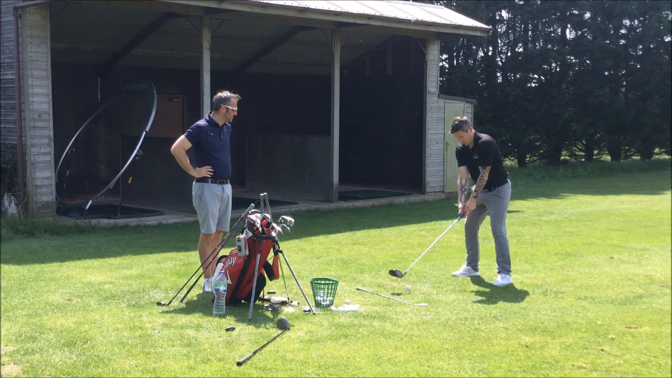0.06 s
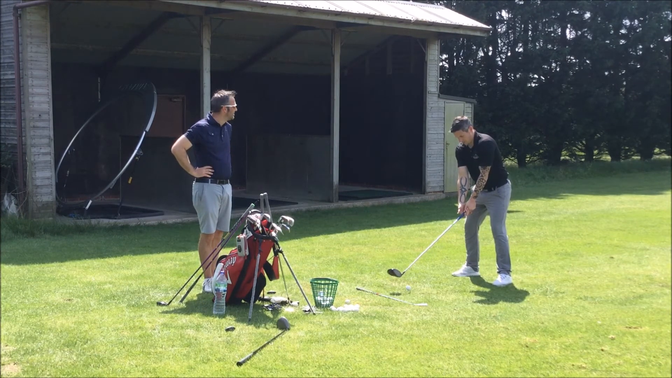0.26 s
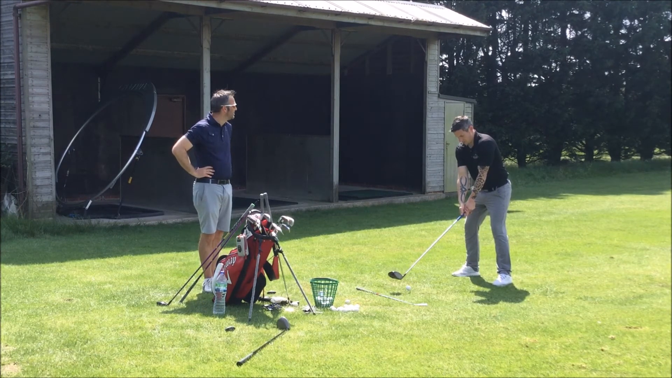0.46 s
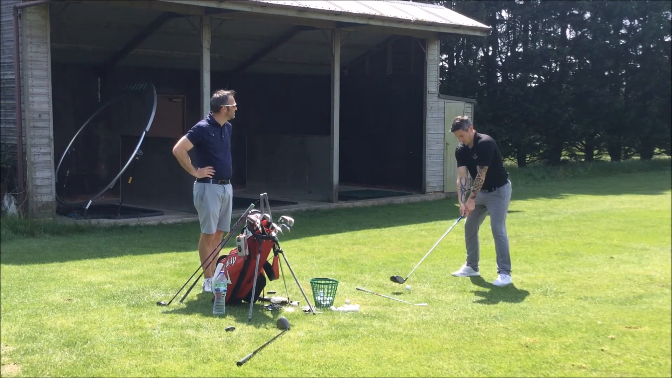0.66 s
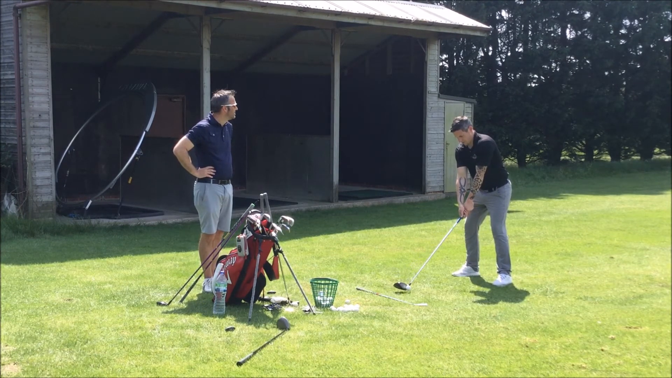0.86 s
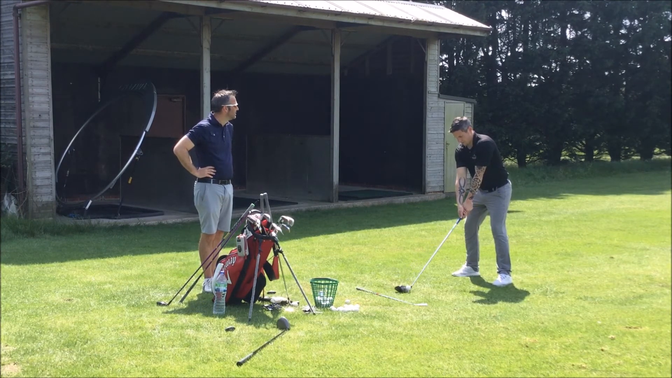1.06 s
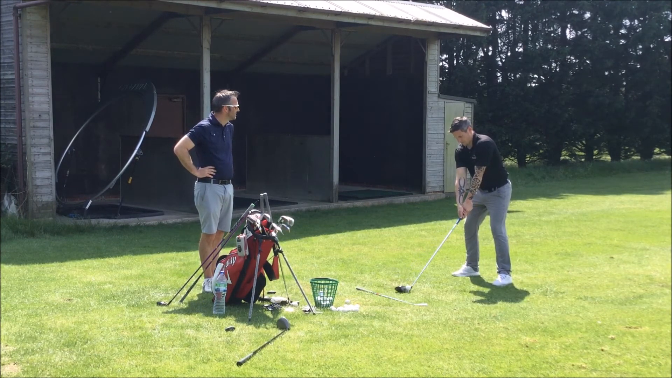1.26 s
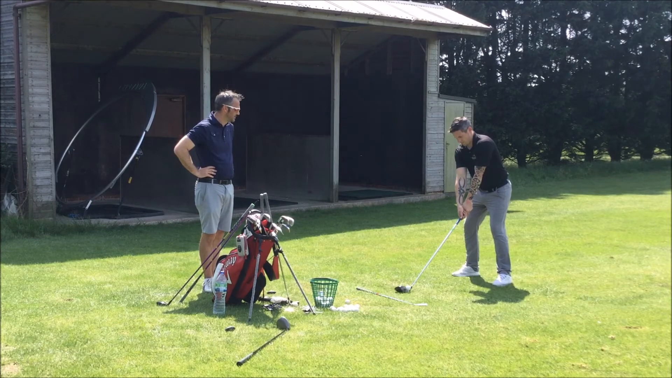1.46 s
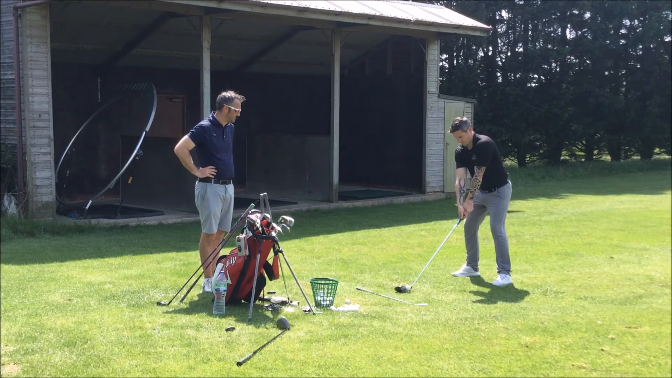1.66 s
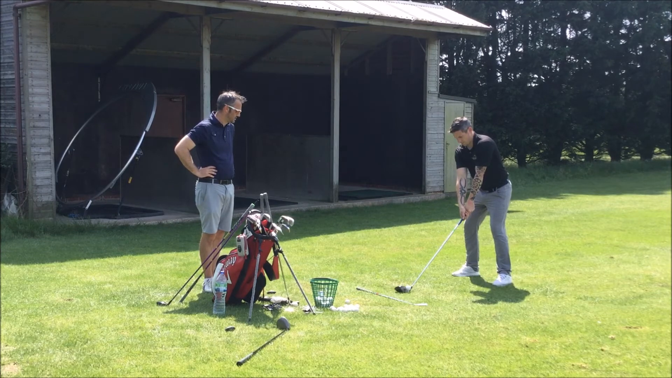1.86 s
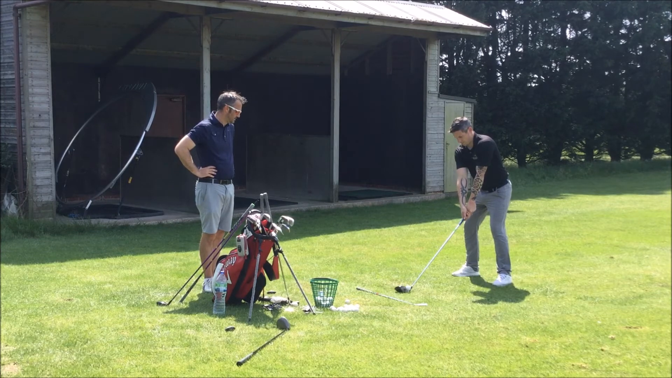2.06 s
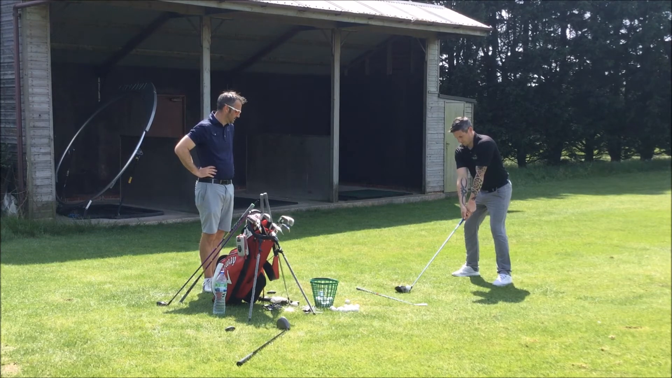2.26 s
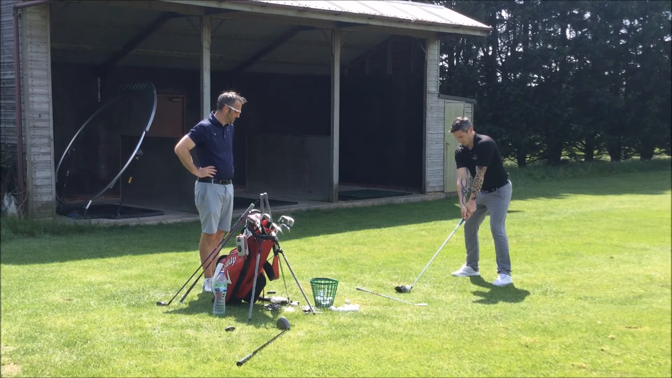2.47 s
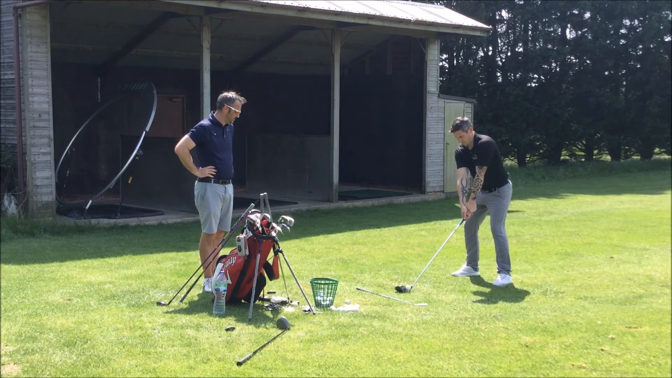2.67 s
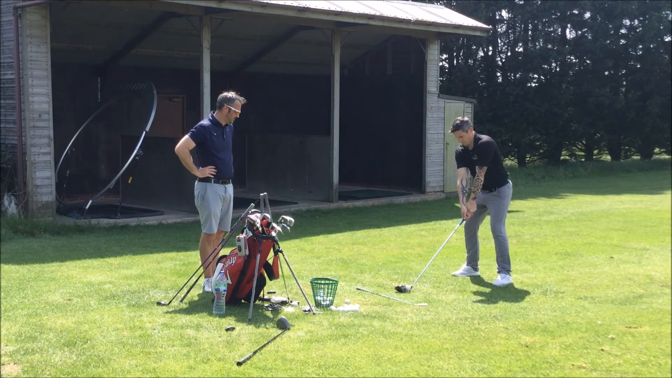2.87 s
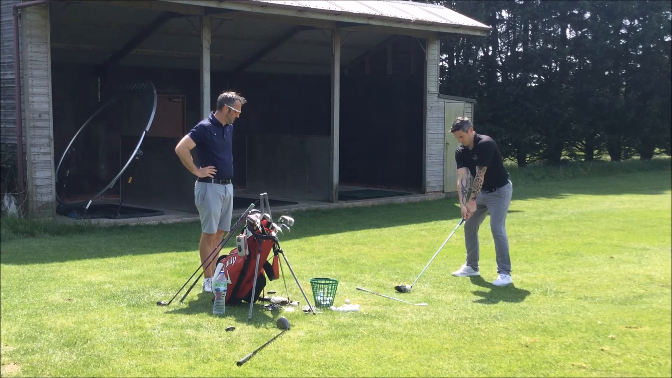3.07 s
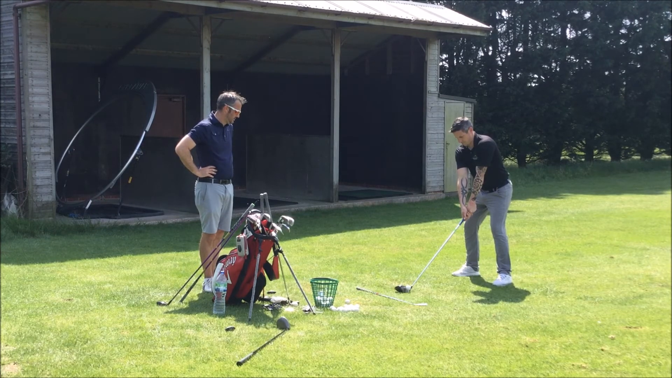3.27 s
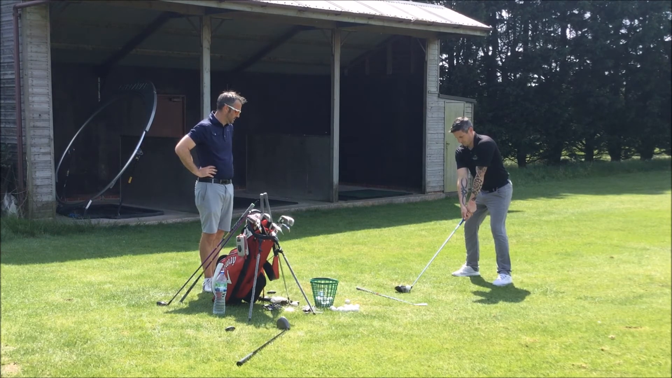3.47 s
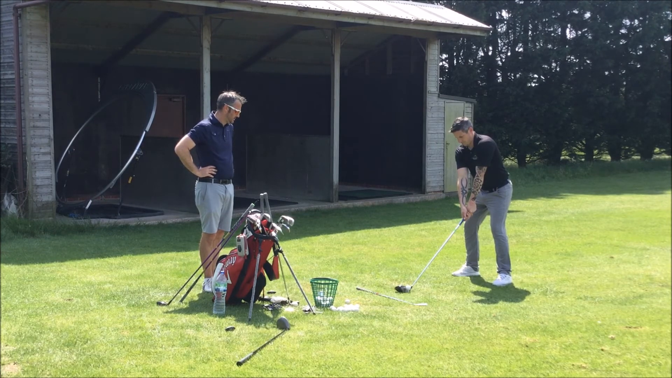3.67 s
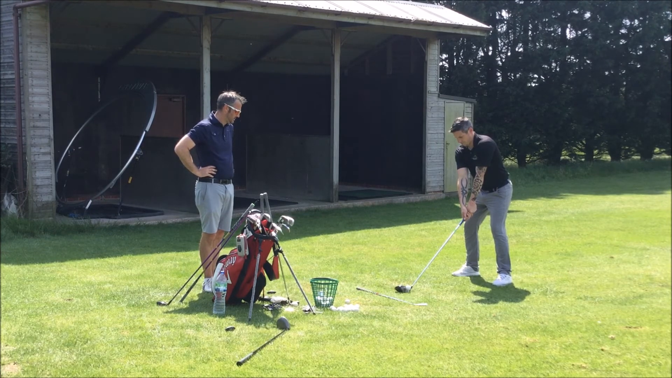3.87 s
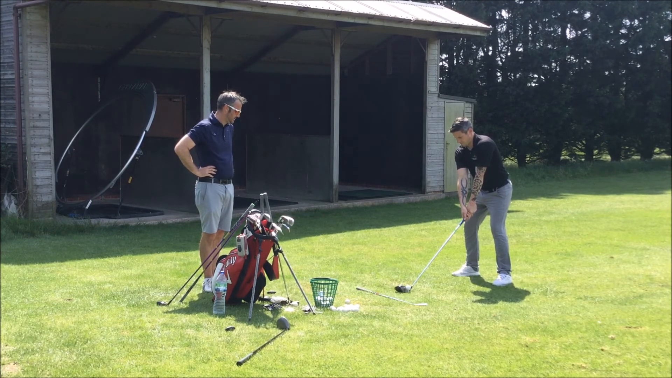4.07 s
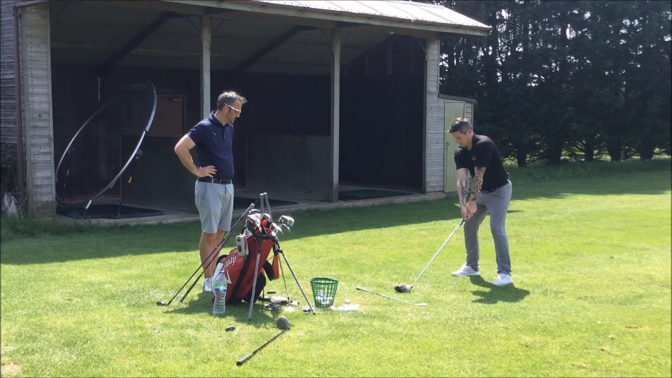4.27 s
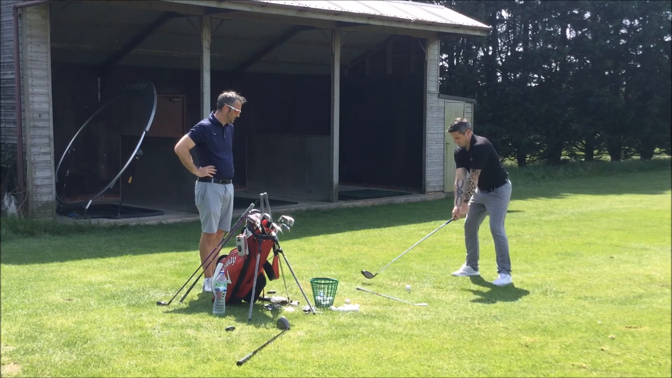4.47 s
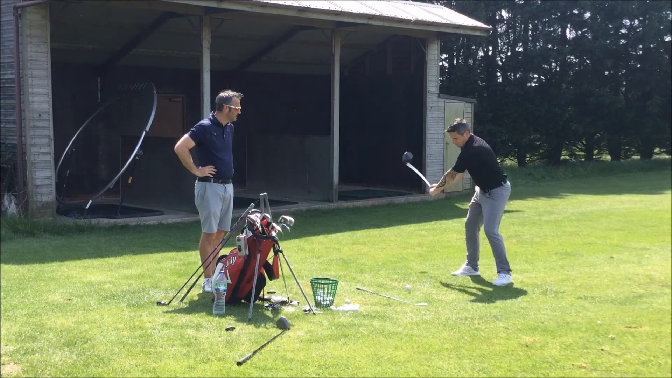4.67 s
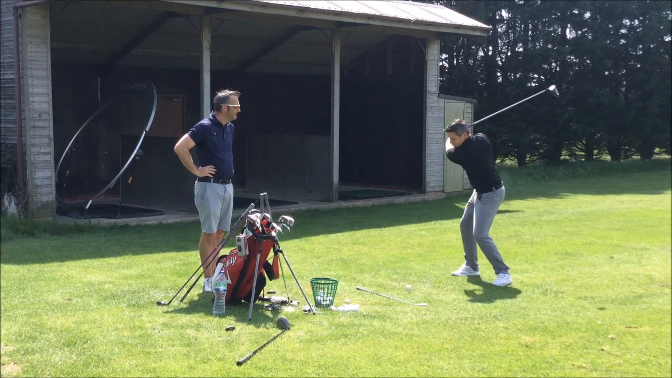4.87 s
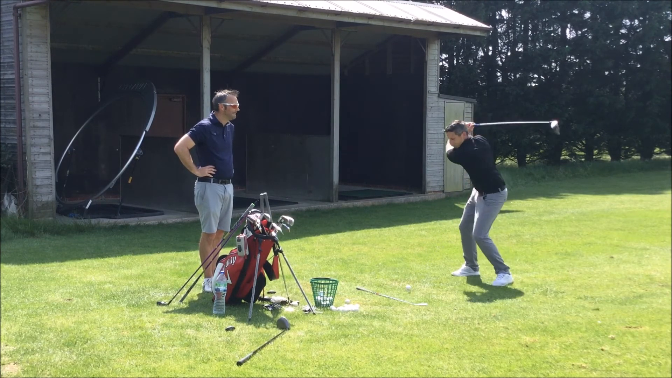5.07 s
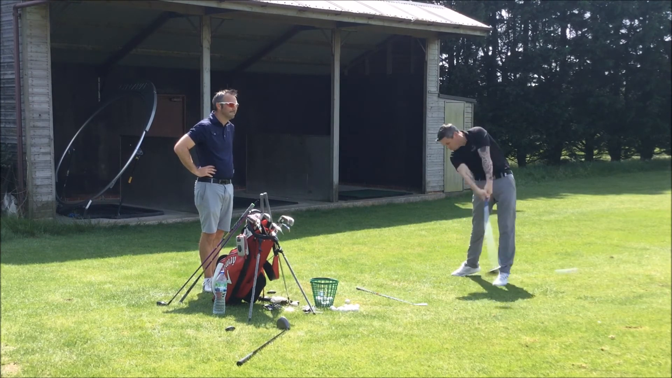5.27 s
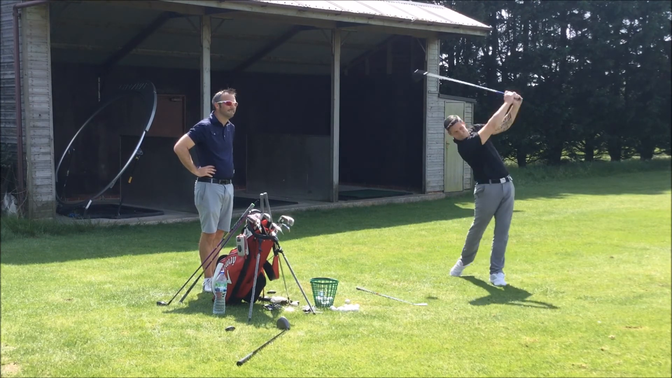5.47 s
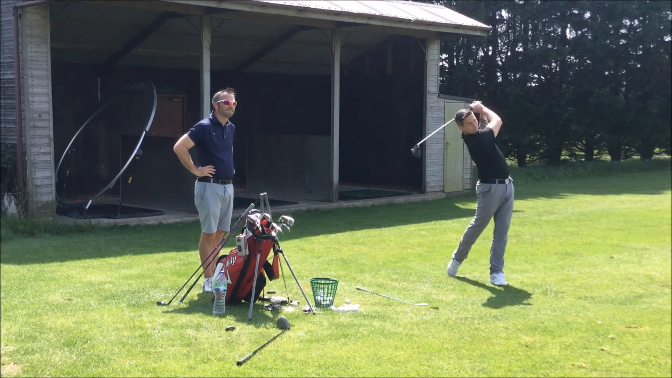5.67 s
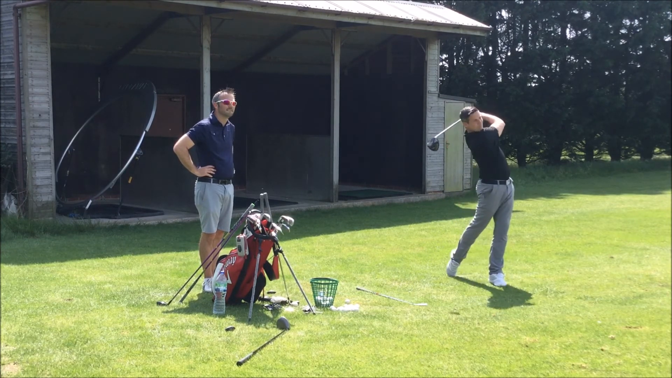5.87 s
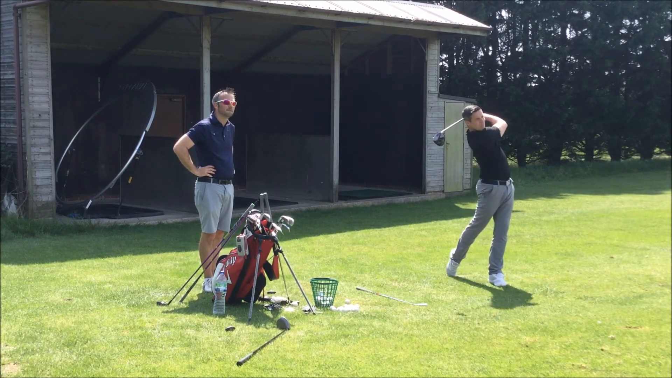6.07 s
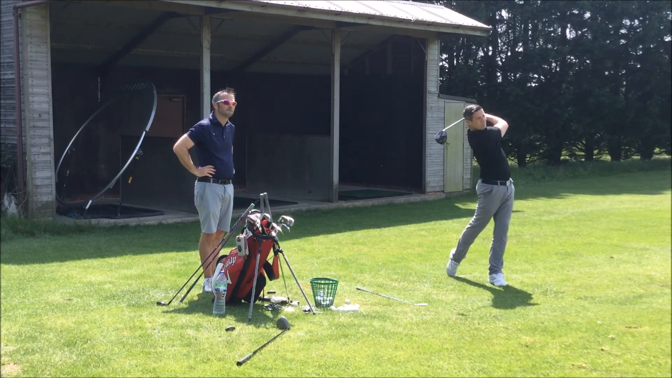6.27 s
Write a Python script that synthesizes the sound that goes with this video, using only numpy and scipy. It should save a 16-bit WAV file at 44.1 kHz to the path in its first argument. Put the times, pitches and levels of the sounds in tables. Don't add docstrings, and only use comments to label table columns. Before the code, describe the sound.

Songbirds whistle and trill over faint distant road rumble, then a golf club swishes and cracks a ball sharply, the echo fading quickly outdoors.

```python
import sys
import numpy as np
from scipy import signal
from scipy.fft import rfft, irfft, next_fast_len
from scipy.io import wavfile
from scipy.ndimage import uniform_filter1d

SR = 44100
rng = np.random.default_rng(int(sys.argv[2]) if len(sys.argv) > 2 else 0)


def int16_out(signal):
    q = np.round(np.clip(np.atleast_2d(signal).T, -1, 1) * 32767)
    wavfile.write(sys.argv[1], SR, q.astype(np.int16))


def elevation(decibels):
    levels = np.asarray(decibels, float)
    return 10 ** (levels / 20)


N = 279329
T = np.arange(N) / SR

# t/s, level/dB, tyre drone against deep rumble/dB
ROAD = [(0.0, -63, -7.5), (.45, -52.5, -15.5), (.75, -56.5, -12.5), (1.3, -61.5, -7.5), (1.7, -58.5, -12),
        (2.3, -57.5, -9.5), (2.8, -59, -10), (3.4, -61.5, -5.5), (4.0, -58.5, -9.5), (4.4, -58.5, -2),
        (4.8, -62.5, -4.5), (5.3, -61, -4.5), (5.7, -61, -1.5), (6.33, -59.5, -9)]
# f/Hz, level per Hz/dB
AIR_TONE = [(12, -57), (20, -25), (69, -8.5), (86, -1.5), (139, -14.5), (174, -10.5), (224, -21),
            (351, -27.5), (382, -32.5), (535, -35), (1020, -40.5), (2010, -42.5), (2970, -46.5),
            (9000, -56), (14400, -57), (16500, -70)]
AIR_DB = -79
DUCK_DB, DUCK_DELAY_S, DUCK_RELEASE_S = -9.5, .05, .23

# t/s, length/s, from f/Hz, to f/Hz, peak level/dB
FADING_CALLS = [
    (0.008, 0.19, 2240, 1790, -79),
    (1.163, 0.094, 2710, 2764, -66.5),
    (0.432, 0.1, 2900, 2510, -82),
    (2.15, 0.077, 4840, 4800, -68),
    (3.86, .145, 5490, 5420, -80.5),
    (4.56, 0.21, 4950, 4700, -79),
]
# t/s, length/s, from f/Hz, to f/Hz, peak level/dB
WHISTLES = [
    (1.575, 0.18, 2260, 2140, -59),
    (1.801, 0.14, 2620, 2480, -60.5),
    (4.2, 0.091, 1950, 2080, -70),
    (0.947, 0.092, 3930, 3880, -77),
    (4.86, 0.18, 2380, 2190, -82),
    (3.625, 0.19, 2380, 2230, -70.5),
]
# t/s, length/s, from f/Hz, to f/Hz, peak level/dB
HELD_WHISTLES = [
    (.62, .24, 2450, 2400, -72.5),
    (2.338, .09, 4830, 4800, -70),
    (4.555, .11, 2720, 2600, -81),
    (3.44, .14, 2740, 2600, -79.5),
    (5.925, .07, 4800, 4800, -86),
    (1.395, .05, 2070, 2050, -73),
    (.8, .04, 2170, 2150, -79),
]
# t/s, length/s, from f/Hz, top f/Hz, peak level/dB
ARCHES = [
    (.7, .225, 1780, 2215, -67),
    (1.297, .225, 1890, 2085, -64.5),
]
# t/s, length/s, from f/Hz, top f/Hz, peak level/dB
BUZZED_ARCHES = [
    (3.297, .155, 2600, 3030, -64),
]
ARCH_TAIL_HZ, BUZZ_TAIL_HZ, HUMP_SHARE, SAG_DB = 1820, 2740, .63, -8.5
# t/s, length/s, from f/Hz, to f/Hz, peak level/dB
TRILLS = [
    (2.774, .16, 2230, 2350, -65),
    (3.01, .195, 2250, 2370, -61),
    (4.44, .115, 2130, 2200, -76),
]
# middle t/s, lowest f/Hz, level/dB
WARBLE = [
    (1.048, 1950, -78),
    (1.085, 1870, -76.5),
    (1.12, 1910, -77),
    (1.152, 2070, -72.5),
]
WARBLE_TOP_HZ, WARBLE_DIP_S, WARBLE_EDGE_DB = 2700, .032, -7
# t/s, length/s, from f/Hz, to f/Hz, level/dB
SLIDES = [(1.332, 0.022, 3200, 3000, -83), (1.345, 0.091, 2700, 2710, -84), (1.6, .05, 3200, 2940, -86),
          (1.952, 0.071, 1900, 1730, -89), (2.029, 0.091, 2430, 2466, -84), (2.277, 0.12, 2335, 2100, -85),
          (2.376, 0.043, 4000, 4100, -85), (1.468, 0.035, 3210, 3140, -78), (1.545, 0.031, 3400, 2990, -78),
          (2.099, 0.067, 3890, 4060, -78.5), (2.292, 0.045, 3900, 4110, -75.5),
          (2.863, 0.026, 4440, 4440, -83),
          (3.49, .025, 4400, 4640, -85), (3.522, 0.021, 3830, 3680, -83), (3.488, 0.11, 1354, 1300, -83.5),
          (3.658, 0.03, 4300, 5100, -89), (3.709, 0.019, 3950, 2840, -76.5), (3.74, 0.052, 2950, 4300, -89),
          (3.894, 0.017, 3900, 2930, -71.5), (3.923, 0.018, 3040, 3200, -75),
          (3.97, 0.027, 2950, 2850, -75.5), (4.08, 0.023, 4070, 2890, -76),
          (4.116, 0.058, 3090, 4610, -79.5), (4.164, 0.017, 2900, 3020, -77.5),
          (4.174, .02, 2900, 2500, -81), (4.199, .04, 5750, 6300, -90.5), (4.41, 0.019, 6300, 6930, -81),
          (4.494, 0.034, 3200, 4260, -86), (6.203, 0.029, 4400, 4250, -86.5),
          (6.256, 0.03, 3900, 3900, -88)]
# t/s, length/s, from f/Hz, to f/Hz, level/dB
COOS = [
    (0.049, 0.12, 556, 515, -85),
    (0.424, 0.091, 559, 518, -80.5),
    (2.253, 0.15, 546, 582, -84),
    (3.492, 0.086, 586, 550, -87),
]
# t/s, length/s, from f/Hz, to f/Hz, level/dB
TWITTER = [(3.282, .03, 3710, 3670, -84), (3.398, 0.028, 3950, 3570, -86), (3.56, .02, 3550, 3400, -87),
           (3.594, 0.028, 3150, 3000, -82), (3.636, 0.024, 3520, 3800, -87),
           (3.797, 0.022, 2950, 3000, -85), (3.955, .022, 2050, 2850, -84), (4.104, 0.027, 3300, 3200, -78),
           (4.182, 0.024, 4200, 4150, -88), (4.248, 0.039, 4700, 4750, -91),
           (4.294, 0.037, 4700, 4850, -93), (4.241, 0.078, 3160, 3200, -90), (4.36, .02, 2910, 2940, -85),
           (4.386, 0.034, 4300, 4430, -91), (4.6, 0.044, 2300, 2240, -82.5),
           (3.038, 0.019, 3900, 3870, -92), (3.152, 0.021, 3780, 3670, -86.5),
           (3.185, .02, 5600, 5900, -94)]
# t/s, length/s, from f/Hz, to f/Hz, level/dB
SYLLABLES = [(.56, 0.096, 4750, 4650, -94), (.74, 0.1, 4550, 4450, -90), (.78, .06, 5050, 5150, -89),
             (.86, 0.055, 5200, 5100, -84), (.88, 0.078, 4650, 4800, -89), (.96, 0.061, 5150, 5050, -85),
             (.975, 0.056, 4800, 4630, -81), (1.08, 0.063, 5150, 5200, -92), (1.1, 0.038, 3900, 3980, -88),
             (.755, .025, 3900, 3830, -85), (1.93, 0.043, 4600, 4700, -89), (1.985, .04, 4600, 4620, -79.5),
             (2.005, 0.039, 4850, 4790, -82), (2.06, 0.055, 4900, 4790, -83), (2.125, .03, 5000, 5070, -79),
             (2.18, 0.049, 5000, 5050, -82), (2.185, 0.044, 4450, 4580, -80), (2.26, .045, 5050, 5000, -88),
             (0.005, .04, 3150, 3150, -91), (2.76, 0.062, 1745, 1800, -84)]
# peak as share of length, start level/dB, end level/dB, opening scoop as share of pitch
SWELL, FADE, HOLD = (.72, -10, -20, 0), (.2, -5, -15, .01), (.62, -7, -9, .1)
LEVEL = (.5, -6, -7, .05)
SCOOP_S = .016
# middle t/s, length/s, level/dB
FLOCK = [
    (.75, 0.56, -91),
    (0.99, 0.35, -86.5),
    (1.55, 0.98, -92),
    (2.053, 0.41, -82),
    (2.203, 0.23, -82.5),
    (2.364, 0.16, -83.5),
    (3.6, 0.8, -99),
    (4.156, 0.36, -100),
    (4.45, 0.44, -94),
]

# t/s, length/s, f/Hz, width/Hz,
# level/dB
RUSTLES = [
    (4.553, .09, 11800, 7400, -83),
    (4.585, .025, 11800, 7400, -84),
    (5.245, .048, 7000, 11000, -84),
    (5.412, .024, 8220, 700, -43),
    (5.4217, .003, 12500, 6000, -45),
    (5.354, .026, 650, 350, -59),
    (5.382, .018, 620, 300, -53),
    (5.398, .018, 1000, 300, -48),
    (1.3, 0.48, 3400, 2600, -83.5),
    (3.3, 0.95, 3200, 2200, -88),
]
# f/Hz, level per Hz/dB
SWISH_TONE = [(120, -36), (200, -10), (722, -1.5), (1000, 0.5), (1210, -16), (2170, -11.5), (2910, -20),
              (7680, -24.5), (8270, -22), (16000, -38)]
DOWNSWING_S, SWISH_LOW_DB, SWISH_LOW_POWER, SWISH_HIGH_DB, SWISH_HIGH_POWER = .14, -36, 6.6, -40.5, 9.2
SWISH_PITCH_REST, SWISH_PITCH_GAIN = .45, .65

STRIKE_S = 5.4266
# f/Hz, level/dB, t60/s
HEAD_MODES = [(604, -3.5, 0.021), (727, -3, 0.02), (1321, -7, 0.013), (2100, -21.5, 0.051),
              (2347, -22.5, 0.035), (3900, -3.5, .013), (4700, -24.5, 0.03), (5750, -12.5, 0.02),
              (6200, -7.5, 0.017), (7600, -22, 0.02), (8310, -14, 0.029), (8880, -10, 0.032),
              (9400, -8.5, 0.023), (10360, -7.5, 0.017), (10700, -7.5, 0.013), (11370, -8, 0.015),
              (12100, -14, 0.0088), (13200, -10, 0.018), (390, -13, 0.014), (1700, -12, 0.012)]
# delay/s, level below 2 kHz/dB, level above/dB
ECHOES = [
    (.0077, -24, -14),
    (.0270, -33, -30.5),
    (.037, -38, -30),
    (.0520, -36.5, -24.5),
    (0.0573, -37, -27),
    (0.0661, -29, -22.5),
    (.0768, -26, -30),
    (.083, -34, -35),
    (.0920, -38, -36),
    (.128, -37.5, -40),
]
ECHO_T60_S = .042
# delay/s, length/s, f/Hz, width/Hz, level/dB
FLUTTERS = [(.025, .018, 2200, 400, -35), (.054, .012, 1450, 700, -35), (.073, .012, 1400, 600, -33),
            (.074, .009, 850, 400, -33), (.008, .01, 8800, 500, -25), (.063, .014, 5400, 700, -39),
            (.064, .014, 9000, 1600, -39), (.082, .026, 5400, 450, -39), (.1, .05, 5500, 900, -49),
            (.4, .022, 2150, 500, -69), (.416, .025, 2250, 400, -66), (.404, .045, 4500, 400, -67),
            (.4, .03, 6250, 500, -72)]
# f/Hz, level per Hz/dB
SCATTER_TONE = [(59, -57), (100, -24.5), (126, -10), (185, 0), (389, -6.5), (513, -6), (1200, -6),
                (1310, -3), (2800, -14), (5420, -11), (7290, -10.5), (8830, -6.5), (16000, -33)]
# f/Hz, width/Hz, level/dB, gain per second/dB
LINGER = [(664.5, 280, -9.5, -16), (2175, 420, -14, 2), (4400, 300, -15.5, 8), (5550, 410, -8.5, -22.5),
          (6300, 880, -17, 6.5), (8800, 720, -11.5, -9), (12000, 1500, -10.5, -38.5)]
# delay/s, level/dB, 60 dB swell/s, t60/s
RETURNS = [
    (.0014, -15, .001, .044),
    (.02, -39.5, .03, .3),
    (.073, -39, .3, .3),
    (.26, -61.5, .7, .38),
    (.412, -65, .06, .3),
]

# t/s, length/s, above f/Hz, level/dB
THIN_MOMENTS = [(0.282, 0.033, 2500, -3.5), (0.575, 0.032, 2540, -7), (0.768, 0.028, 5260, -6),
                (1.282, 0.035, 3000, -5), (1.495, 0.087, 4030, -6), (1.569, 0.059, 3540, -8),
                (2.004, 0.021, 5330, -3), (2.177, 0.027, 5400, -11), (2.105, .025, 5400, -5),
                (2.14, .02, 5400, -5), (2.775, .028, 4200, -6), (3.157, 0.024, 4500, -6),
                (3.225, 0.027, 5500, -5), (4.0, 0.032, 3500, -4), (4.12, .025, 4480, -3),
                (4.228, .022, 3500, -5), (4.266, .022, 5000, -4), (4.31, .022, 5000, -3),
                (4.478, 0.021, 3020, -4), (4.523, .025, 5500, -3), (4.954, 0.022, 3000, -3),
                (5.592, .018, 1300, -3), (5.657, .017, 1300, -5), (5.68, .44, 14100, -20),
                (5.74, .27, 13500, -14), (5.846, .02, 900, -5), (6.125, .022, 2500, -3),
                (6.215, .03, 3000, -3)]
STRONG_LINE = 1.95


def track(rows, column, outside):
    rows = np.array(rows, float)
    return np.interp(T, rows[:, 0], rows[:, column], outside, outside)


def tinted(tone, lo_hz, hi_hz, count=N):
    size = next_fast_len(count, True)
    hz = np.fft.rfftfreq(size, 1 / SR) + 1
    rows = np.array(tone, float)
    gain = elevation(np.interp(np.log(hz), np.log(rows[:, 0]), rows[:, 1])) * (hz >= lo_hz) * (hz < hi_hz)
    real, imaginary = rng.standard_normal((2, len(hz)))
    x = irfft(gain * (real + 1j * imaginary), size)[:count]
    return x / np.std(x)


def flat_band(hz, width, count):
    return tinted([(20, 0), (20000, 0)], hz - width / 2, hz + width / 2, count)


def walk(rate, count=N):
    k = int(SR / rate)
    held = np.repeat(rng.standard_normal(2000)[:count // k + 1], k)
    return 1.3 * uniform_filter1d(uniform_filter1d(held, k), k)[:count]


def above(x, hz):
    return signal.sosfiltfilt(signal.cheby1(6, .1, hz, "high", fs=SR, output="sos"), x)


def add(out, s, x):
    i = int(s * SR)
    out[i:i + len(x)] += x[:N - i]


def ambience():
    road_db = track(ROAD, 1, -58)
    late = T - STRIKE_S - DUCK_DELAY_S
    duck_db = DUCK_DB * np.exp(-np.abs(late) / DUCK_RELEASE_S) * (late > 0)
    deep = above(tinted(AIR_TONE, 20, 130), 46) * elevation(road_db + duck_db + 2.0 * walk(11))
    drone = tinted(AIR_TONE, 130, 350) * elevation(road_db + track(ROAD, 2, -12.0) + 2.0 * walk(13))
    insects = tinted([(8300, -10.0), (9000, 2.0), (9300, -8.0)], 7600, 12000) * elevation(-93)
    air = tinted(AIR_TONE, 350, 16500) * elevation(AIR_DB + 0.84 * walk(3))
    return deep + drone + insects + air


def note(out, rows, edge_s, wobble_hz, wobble_rate, flutter_db, uneven=.25):
    rows = np.array(rows, float)
    t = np.arange(rows[0, 0], rows[-1, 0], 1 / SR)
    beat = 2 * np.pi * np.cumsum(wobble_rate * (1 + uneven * walk(30, len(t)))) / SR
    hz = np.interp(t, rows[:, 0], rows[:, 1]) + wobble_hz * np.sin(beat)
    edge = np.clip(np.minimum(t - t[0], t[-1] - t) / edge_s, 0, 1)
    flutter = walk(63.8, len(t)) + 0.98 * walk(260, len(t))
    db = np.interp(t, rows[:, 0], rows[:, 2]) + flutter_db * flutter
    add(out, t[0], np.sqrt(2) * elevation(db) * edge * np.sin(2 * np.pi * np.cumsum(hz) / SR))


def shaped(rows, shape):
    s, length, hz0, hz1, db = rows
    at, start_db, end_db, scoop = shape
    peak_hz = hz0 + np.sqrt(at) * (hz1 - hz0)
    return [(s, hz0 * (1 - scoop), db + start_db - 4), (s + SCOOP_S, hz0, db + start_db),
            (s + at * length, peak_hz, db), (s + length, hz1, db + end_db)]


def arched(rows, tail_hz, tail_db=-9.5):
    s, length, hz, top_hz, db = rows
    u = np.linspace(0, 1, 15)
    hump = np.sin(np.pi * u) ** 1.5
    pitch = hz + (tail_hz - hz) * u + (top_hz - (hz + tail_hz) / 2) * hump
    level = db + SAG_DB * (1 - hump) - 5 * (1 - u) ** 4
    rise = np.c_[s + HUMP_SHARE * length * u, pitch, level]
    tail = [(s + 0.8 * length, tail_hz, db + tail_db), (s + length, .99 * tail_hz, db + tail_db - 8)]
    return np.r_[rise, tail]


def warble_dip(s, low_hz, db):
    u = np.linspace(-1, 1, 9)
    hz = low_hz + (WARBLE_TOP_HZ - low_hz) * np.abs(u) ** 1.5
    return np.c_[s + u * WARBLE_DIP_S / 2, hz, db + WARBLE_EDGE_DB * u ** 2]


def through_leaves(song):
    t = T[:SR // 2]
    leaves = rng.standard_normal(len(t)) * elevation(-60 * t / 0.3) * (t > .006) * (1 + 2.0 * np.exp(-t / 0.014))
    return song + elevation(-6.5) * signal.fftconvolve(song, leaves / np.linalg.norm(leaves))[:N]


def birds():
    song = flock()
    for rows in WHISTLES:
        note(song, shaped(rows, SWELL), 0.007, 11, 56.6, 1.4)
    for rows in FADING_CALLS:
        note(song, shaped(rows, FADE), 0.006, 9.9, 55, 1.36)
    for rows in HELD_WHISTLES:
        note(song, shaped(rows, LEVEL), 0.011, 12, 40, 1.3)
    for rows in ARCHES:
        note(song, arched(rows, ARCH_TAIL_HZ), 0.01, 30, 70, 2.0)
    for rows in BUZZED_ARCHES:
        note(song, arched(rows, BUZZ_TAIL_HZ, tail_db=-18), 0.01, 115, 95, 2.0)
    for rows in TRILLS:
        note(song, shaped(rows, HOLD), 0.011, -80, 29, 2.0, uneven=.08)
    for s, low_hz, db in WARBLE:
        note(song, warble_dip(s, low_hz, db), 0.0018, 40, 150, 3.3)
    for s, length, hz0, hz1, db in SLIDES + COOS + TWITTER + SYLLABLES:
        note(song, [(s, hz0, db), (s + length, hz1, db)], 0.004, 70 * hz0 / 3500, 130, 2.0)
    return through_leaves(song)


def flock():
    out, t = np.zeros(N), T[:int(.016 * SR)]
    for when, pitch, slide, size in rng.random((7000, 4)):
        hz = 4150 + 620 * (pitch + slide) + 9000 * (slide - .5) * t
        add(out, 6.1 * when, size * np.hanning(len(t)) * np.sin(2 * np.pi * hz * t))
    busy = sum(elevation(db) * np.clip(1 - (2 * (T - s) / length) ** 2, 0, 1) for s, length, db in FLOCK)
    return out / np.std(out) * busy


def rustles():
    out = np.zeros(N)
    for s, length, hz, width, db in RUSTLES:
        count = int(length * SR)
        hiss = flat_band(hz, width, 2 * SR)[:count] * elevation(db + 2.2 * walk(100, count))
        add(out, s, hiss * np.hanning(count))
    return out


def swish():
    start = N - 2 * SR
    low = np.pad(tinted(SWISH_TONE, 170, 2200, 2 * SR), (start, 0))
    high = np.pad(tinted(SWISH_TONE, 1900, 16000, 2 * SR), (start, 0))
    speed = np.clip(1 + (T - STRIKE_S) / DOWNSWING_S, 0, 1) * (T < STRIKE_S)
    pace = SWISH_PITCH_REST + SWISH_PITCH_GAIN * speed
    low = np.interp(N - np.cumsum(pace[::-1])[::-1], np.arange(N), low)
    low = low * elevation(SWISH_LOW_DB) * speed ** SWISH_LOW_POWER
    return low + high * elevation(SWISH_HIGH_DB) * speed ** SWISH_HIGH_POWER


def strike():
    out, blow = scatter(), crack()
    add(out, STRIKE_S, blow)
    add(out, STRIKE_S + 0.0017, -elevation(-3.0) * np.hanning(int(0.0044 * SR)))
    add_echoes(out, blow)
    add_flutters(out)
    return out


def crack():
    t = T[:SR // 8]
    phase = 2 * np.pi * rng.random(len(HEAD_MODES))
    phase[:2] = np.pi / 2 - 2 * np.pi * np.array(HEAD_MODES)[:2, 0] * .0013
    rings = np.zeros(len(t))
    for (hz, db, t60), p in zip(HEAD_MODES, phase):
        rings += elevation(db - 60 * t / t60) * np.sin(2 * np.pi * hz * t + p)
    grit = np.convolve(rng.standard_normal(len(t) + 1), [1, 0, -1])[:len(t)]
    grit = grit * (elevation(-17.5 - 60 * t / 0.058) + elevation(-3.5 - 60 * t / 0.0018))
    rise = 1 - np.exp(-t / 0.00052)
    return rise * (rings + grit)


def scatter():
    late, out = np.clip(T[-SR:] - STRIKE_S, 0, 1), 0
    tone = np.array(SCATTER_TONE)
    far_trees = late > .39
    for hz in 100 * 2 ** np.arange(0, 7.3, .5):
        band = tinted(tone, hz, hz * np.sqrt(2), SR)
        share = np.interp(np.log(hz * 1.19), np.log(tone[:, 0]), tone[:, 1]) + 10 * np.log10(hz / 3000)
        loss = 18 * (hz / 10000) ** 2 + 12 * (hz < 1500)
        level = share + 1.8 * walk(150, SR) - loss * late - 7 * (hz > 9000) * far_trees
        out = out + band * elevation(level)
    for hz, width, db, gain_db in LINGER:
        ring = tinted([(hz - width, -15), (hz, 0), (hz + width, -15)], hz - width, hz + width, SR)
        level = db + gain_db * late - 7.5 * (hz > 9000) * far_trees + 2.6 * walk(50, SR) + 2.0
        out = out + ring * elevation(level) * np.clip(late / 0.051, 0, 1)
    clouds = 0
    for delay, db, swell, t60 in RETURNS:
        clouds = clouds + elevation(db - 60 * np.maximum((delay - late) / swell, (late - delay) / t60))
    return np.pad(out * clouds * (late > RETURNS[0][0]), (N - SR, 0))


def add_echoes(out, blow):
    bright = signal.sosfilt(signal.butter(2, 2000, "high", fs=SR, output="sos"), blow)
    for delay, low_db, high_db in ECHOES:
        far = delay > .01
        short = elevation(-60 * T[:len(blow)] / ECHO_T60_S * far)
        treble = bright - far * 0.32 * above(bright, 10000)
        add(out, STRIKE_S + delay, short * (elevation(low_db) * (blow - bright) + elevation(high_db) * treble))


def add_flutters(out):
    for delay, length, hz, width, db in FLUTTERS:
        count = int(length * SR)
        add(out, STRIKE_S + delay, flat_band(hz, width, SR // 4)[:count] * elevation(db) * np.hanning(count))


def scene():
    w = 2 * np.pi * 66
    bass_cut = signal.bilinear([1, 0, 0], [1, w / 1.25, w * w], SR)
    blow = signal.lfilter(*bass_cut, strike())
    return (blow + (swish() + rustles()) + birds() + ambience())[None]


def thin_treble(x):
    for s, length, hz, db in THIN_MOMENTS:
        part = slice(int((s - length) * SR), int((s + length) * SR))
        dip = np.clip(3 - 6 * np.abs(T[part] - s) / length, 0, 1)
        bins = rfft(dip * above(x[part], hz))
        size = np.abs(bins)
        weak = (size < STRONG_LINE * uniform_filter1d(size, size=41)) | (length > .1)
        x[part] -= (1 - elevation(db - 6)) * irfft(bins * weak, len(dip))
    return x


def top_cut(x):
    return signal.sosfilt(signal.butter(12, 16820, fs=SR, output="sos"), x)


def record(dry):
    x = .92 * np.tanh(1.3 * dry[0])
    x = x - above(x, 15900)
    mix = thin_treble(x)[None]
    return top_cut(mix)


dry = scene()
out = record(dry)
int16_out(out)
```